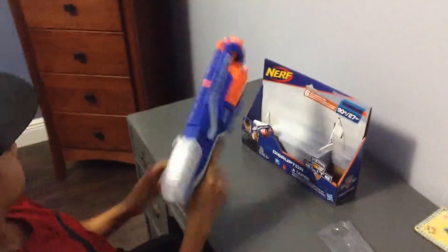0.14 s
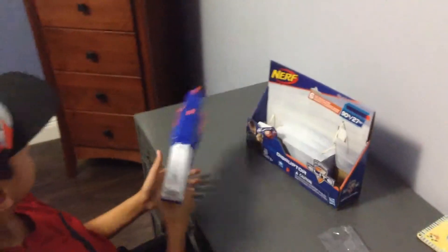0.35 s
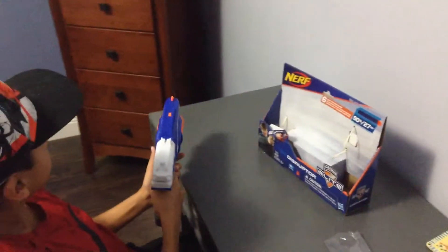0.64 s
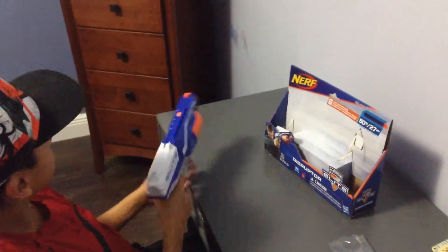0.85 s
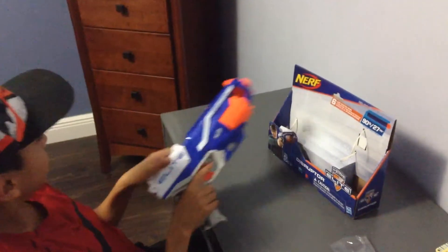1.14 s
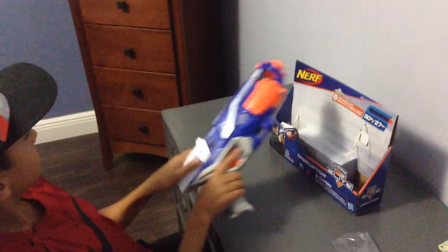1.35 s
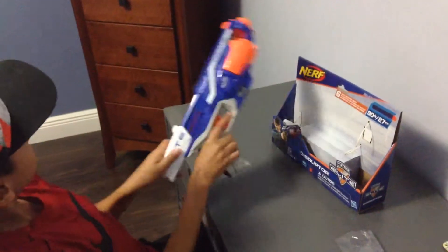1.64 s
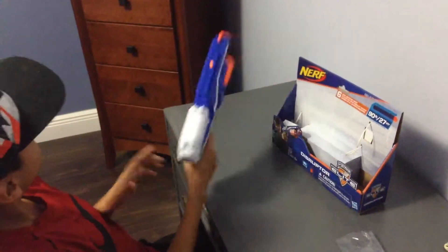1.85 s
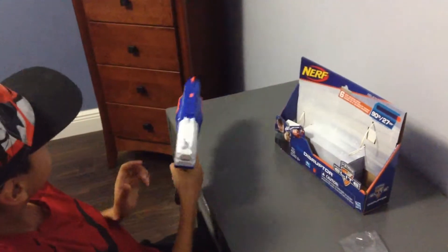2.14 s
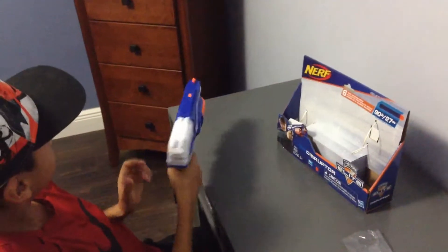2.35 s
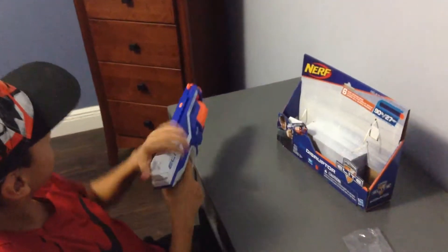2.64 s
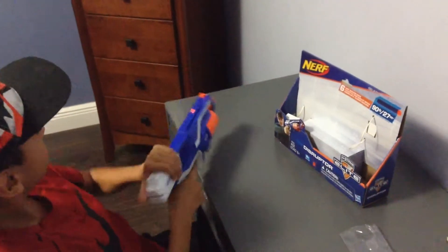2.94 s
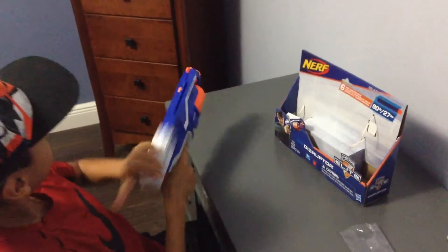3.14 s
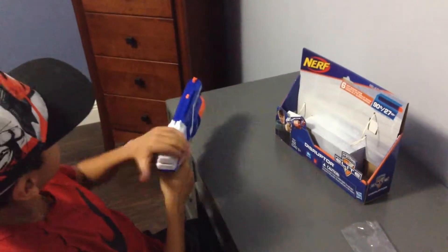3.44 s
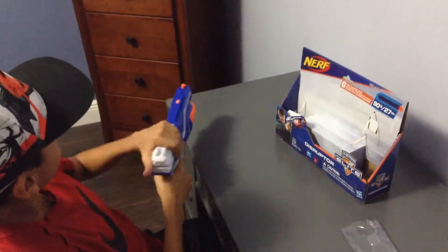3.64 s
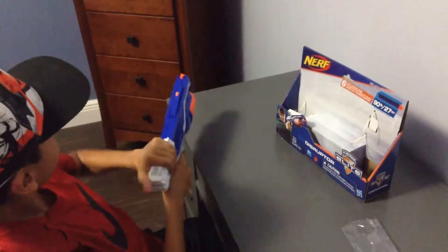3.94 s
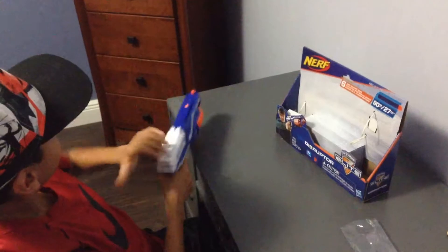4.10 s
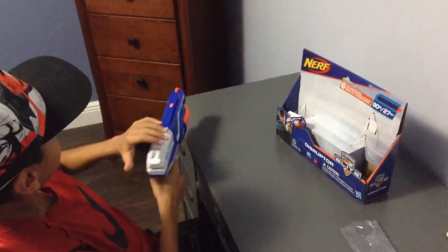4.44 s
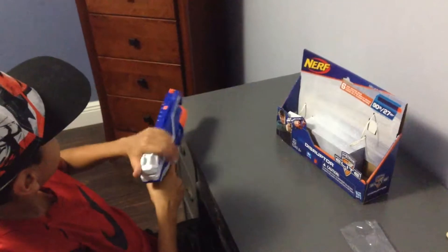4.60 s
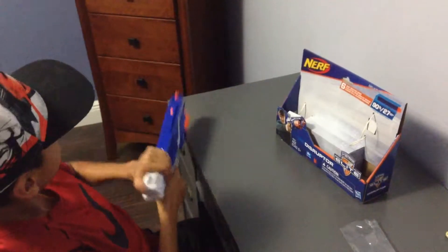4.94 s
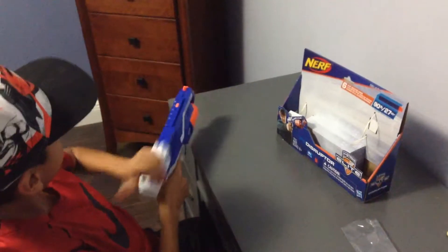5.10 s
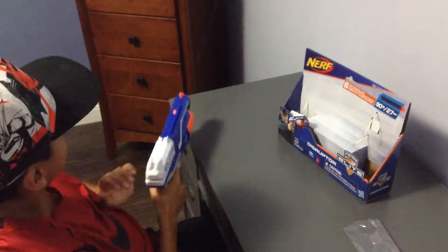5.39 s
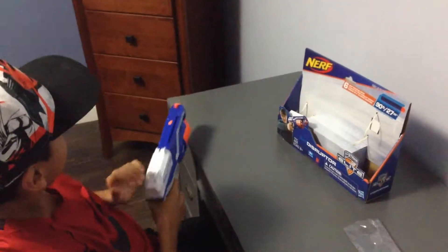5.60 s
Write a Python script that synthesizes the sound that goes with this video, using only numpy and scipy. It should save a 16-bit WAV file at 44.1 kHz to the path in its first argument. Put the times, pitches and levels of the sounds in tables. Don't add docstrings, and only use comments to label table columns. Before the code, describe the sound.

Loud plastic cocking slams, ratchety clicks and short scrapes alternate with popping dart shots and dull bounces, close up in a lightly echoing bedroom.

```python
import sys
import numpy as np
from scipy import signal
from scipy.fft import rfft, irfft
from scipy.io import wavfile
from scipy.ndimage import uniform_filter1d

SR = 44100
rng = np.random.default_rng(int(sys.argv[2]) if len(sys.argv) > 2 else 0)


def output_pcm(signal):
    pcm = np.clip(np.atleast_2d(signal).T, -1, 1) * 32767
    wavfile.write(sys.argv[1], SR, np.round(pcm).astype(np.int16))


def how_loud(loudness_db):
    steps = np.asarray(loudness_db, float) / 20
    return 10 ** steps


N = 254016

# (frequency [Hz], rms level [dB])
HUM = [(121, -72.5), (242, -59)]
# (frequency [Hz], density [dB per Hz])
AIR_SPECTRUM = [(24, -67), (40, -44), (158, -9), (241, -5.5), (387, -6), (522, 0), (1450, -12.5),
                (2060, -11), (2570, -18.5), (2770, -12.5), (4460, -18.5), (14400, -30.5), (15500, -31)]
# (frequency [Hz], time to fall 60 dB [s])
ROOM_T60 = [(130, 0.24), (330, 0.37), (870, 0.45), (2300, 0.43), (6000, 0.39), (14000, 0.27)]
# (delay [ms], level [dB])
WALLS = [(3.1, -9.5), (6.5, -15.5), (9, -15), (13, -16), (18, -27), (24, -17)]
# (frequency [Hz], width [Hz], gain [dB])
SHELL = [(500, 137, 2), (694, 104, 3), (1013, 53, 4), (1242, 54, 4.5), (2220, 88, 3), (4340, 420, 0.5),
         (6230, 340, 1), (9100, 1200, 1.5)]
# (frequency [Hz], density [dB per Hz])
RUB_SPECTRUM = [(120, -49), (200, -34), (258, -26), (376, -38), (512, 2), (963, 2), (1880, 1.5),
                (6770, -8.5), (15000, -19)]
# (start [s], end [s], start level [dB], end level [dB])
STROKES = [(0.0, 0.173, -35, -87), (1.07, 1.3, -53, -72), (1.33, 1.439, -62, -40.5),
           (1.447, 1.54, -50, -63.5), (1.682, 1.743, -36.5, -54), (1.75, 1.818, -61, -21.5),
           (2.457, 2.65, -47.5, -68), (2.783, 2.94, -34, -57.5), (3.079, 3.196, -41, -45),
           (3.718, 3.854, -37, -41.5), (3.983, 4.1, -44, -42), (4.6, 4.778, -72, -43.5),
           (4.781, 4.87, -40.5, -64), (5.053, 5.166, -54, -35.5)]

# (frequency [Hz], density [dB per Hz])
CLICK_SPECTRUM = [(120, -65), (200, -24.5), (413, -23.5), (627, -8), (809, -11), (1020, -7.5), (1550, -8),
                  (1730, -8.5), (3450, -10.5), (6760, -10.5), (15300, -19.5)]
SLAM_SPECTRUM = [(59, -51), (100, -55), (180, -25.5), (299, -6.5), (418, -5), (611, -6.5), (803, -11.5),
                 (1010, -6), (1480, -11.5), (2160, -9), (3030, -11), (9830, -9), (15300, -11)]
SHOT_SPECTRUM = [(59, -40), (100, -5), (227, -0.5), (377, -5.5), (574, -2), (723, -5), (856, -7.5),
                 (1420, -4), (3160, -9.5), (4420, -8.5), (7970, -12), (10000, -11.5), (15300, -16)]

# (time [s], blow [dB], ring [Hz], snap [dB])
CLICKS = [(0.081, -25.5, 2020, -19), (0.12, -19, 1400, -22.5), (1.1, -37, 950, -20),
          (1.318, -33.5, 2310, -19), (1.373, -31.5, 2050, -9), (1.427, -25.5, 670, -13),
          (2.509, -28, 1220, -13), (2.754, -30, 790, -14), (2.86, -20.5, 804, -11),
          (2.949, -6.5, 1020, -3.2), (3.08, -18.5, 1550, -2.5), (3.134, -28, 950, -8),
          (3.775, -21, 704, -12), (3.81, -11, 1140, -2), (3.846, -9.5, 960, -4), (3.989, -18.5, 1550, -5),
          (4.804, -21.5, 705, -7), (5.117, -25, 1160, -13)]
# (time [s], blow [dB], ring [Hz], snap [dB])
RATCHETS = [
    (0.134, -23, 1500, -2),
    (0.543, -35.5, 716, -14),
    (1.207, -29, 2600, -11),
    (1.541, -7.5, 1025, -2),
    (1.665, -16.5, 1840, -4),
    (2.773, -15.5, 2500, 8),
]
# (time [s], blow [dB], ring [Hz], snap [dB])
GRIPS = [
    (0.842, -30.5, 800, 1),
    (1.02, -44, 2930, -17),
    (1.466, -14, 2280, -10.5),
    (1.515, -16.5, 1460, -16),
    (3.72, -15.5, 1200, -4.5),
    (4.713, -21, 656, -9),
    (4.871, -9, 2060, -11),
    (5.05, -19, 1530, -13.5),
]
# (time [s], blow [dB], ring [Hz], chatter [ms])
CATCHES = [
    (1.544, -14.5, 4800, 6.5),
    (2.946, -6, 6100, 5),
    (3.853, -20, 4600, 4.5),
    (0.37, -38, 3000, 14),
]
# (time [s], blow [dB], ring [Hz], chatter [ms])
TOUCHES = [
    (1.758, -16, 1880, 3.1),
    (3.688, -31, 3050, 26),
    (.153, -18.5, 1600, 7.8),
    (1.779, -17, 1010, 9),
    (2.932, -18.5, 637, 9.9),
    (3.19, -30, 800, 5.4),
    (4.088, -19.5, 820, 3.9),
    (5.146, -22.5, 1180, 7.7),
]
# (time [s], blow [dB], ring [Hz], chatter [ms])
SLAMS = [
    (0.165, 4, 520, 7.9),
    (1.822, 5, 500, 3.32),
    (3.198, 8, 400, 8.26),
    (4.097, 8, 580, 4.74),
    (5.171, 8, 500, 5.9),
]
# (time [s], blow [dB], ring [Hz], snap [dB])
BUMPS = [
    (0.258, -9.5, 620, -11),
    (1.154, -13.5, 412, -29.5),
    (2.708, -29.5, 537, -47),
]
# (time [s], blow [dB], ring [Hz], snap [dB])
NUDGES = [
    (0.553, -35, 540, -27),
    (1.073, -24, 437, -28),
    (1.937, -13.5, 525, -20),
]
# (time [s], blow [dB], ring [Hz], chatter [ms])
BOUNCES = [
    (.73, -35, 300, 12),
    (2.38, -30, 298, 11),
    (3.55, -28.5, 300, 13.7),
    (4.392, -15.5, 610, 2.6),
    (4.403, -12.5, 1230, 7.2),
    (4.53, -24.5, 200, 16.3),
    (4.6, -36, 180, 20),
    (4.645, -39, 200, 10.5),
    (5.5, -28, 1298, 6.6),
]
# (time [s], blow [dB], ring [Hz], snap [dB])
DARTS = [
    (0.661, -20.5, 1300, -7),
    (2.288, -17.5, 650, -17),
    (3.459, -18.5, 2000, -12),
    (4.468, -24, 1230, 4),
    (5.455, -21, 1300, -14),
]
# (time [s], blow [dB], ring [Hz], chatter [ms])
SHOTS = [
    (0.604, -7, 654, 11.15),
    (2.238, -8.5, 716, 7.5),
    (3.405, -6, 684, 5.96),
    (4.338, -9, 555, 7.7),
    (5.381, -5.5, 1460, 9),
]
# (time [s], blow [dB], ring [Hz], chatter [ms])
WEAK_SHOTS = [
    (4.886, -18, 634, 7.25),
]
# (level beside the usual [dB], ring [Hz])
THUD_TONES = [
    (-.8, 400),
    (3, 600),
    (-.8, 230),
    (.8, 300),
    (1.5, 750),
    (-1.5, 300),
]


def evened(x):
    return x / np.sqrt(np.mean(x ** 2) + 1e-20)


def read(points, hz):
    f, value = np.transpose(points)
    return np.interp(np.log(hz + 1), np.log(f + 1), value)


def band(x, hz, kind, order=2):
    return signal.sosfilt(signal.butter(order, hz, kind, fs=SR, output="sos"), x)


def coloured(points):
    hz = np.fft.rfftfreq(N, 1 / SR)
    return evened(irfft(rfft(rng.standard_normal(N)) * how_loud(read(points, hz)), N))


def causal(db):
    both_sides = np.concatenate([db, db[-2:0:-1]])
    log_gain = np.log(how_loud(np.maximum(both_sides, -100)))
    h = np.fft.ifft(np.exp(log_gain - 1j * signal.hilbert(log_gain).imag)).real
    return h / np.linalg.norm(h)


def resonance_db(hz, modes):
    return sum(db / (1 + (2 * (hz - f) / width) ** 2) for f, width, db in modes)


def wavering(hz):
    return evened(band(rng.standard_normal(N), hz, "low"))


def background():
    t = np.arange(N) / SR
    waver = 1 + 0.54 * wavering(9.6)
    hum = sum(np.sqrt(2) * how_loud(db) * np.sin(2 * np.pi * hz * t) for hz, db in HUM)
    air = how_loud(-53) * coloured(AIR_SPECTRUM) * how_loud(0.27 * wavering(5.1))
    return air + waver * hum


def room(direct, spread, tail_db):
    out = direct.copy()
    for ms, db in WALLS:
        lag = round(ms * SR / 1000)
        out[lag:] += how_loud(db) * direct[:-lag] * rng.choice([-1, 1])
    turn = np.floor(np.arange(N) / SR * 9) % 4
    for k in range(4):
        hz, t, z = signal.stft(rng.standard_normal(SR), SR, nperseg=256)
        decay = how_loud(-60 * t / read(ROOM_T60, hz)[:, None])
        tail = signal.istft(z * decay, SR, nperseg=256)[1]
        tail *= np.minimum(np.arange(len(tail)) / SR / 0.0047, 1)
        fed = spread * uniform_filter1d(1. * (turn == k), 400)
        out += how_loud(tail_db) * signal.fftconvolve(fed, tail / np.linalg.norm(tail))[:N]
    return out


def scrape():
    t, level = np.arange(N) / SR, np.zeros(N)
    for start, end, start_db, end_db in STROKES:
        level += how_loud(np.interp(t, [start, end], [start_db, end_db], -120, -120))
    slips = how_loud(2.4 * wavering(40))
    grain_size = how_loud(0.75 * np.minimum(rng.exponential(1, N), 5))
    grit = grain_size * (rng.random(N) < 2500 / SR)
    rub = coloured(RUB_SPECTRUM) * (.5 + evened(uniform_filter1d(grit, 30)))
    body = causal(resonance_db(np.fft.rfftfreq(2048, 1 / SR), SHELL))
    heard = evened(slips * signal.oaconvolve(rub, body)[:N])
    return how_loud(1.5) * uniform_filter1d(level, 300) * heard


def same_snap(table, ring_db, snap_db):
    return [(s, db, ring_db, snap_db, hz, ms) for s, db, hz, ms in table]


def same_chatter(table, ring_db, ms):
    return [(s, db, ring_db, snap_db, hz, ms) for s, db, hz, snap_db in table]


def knocks(table, colour, level_db, usual_snap_db, taps_per_ms, rise, ring_q, lumps_db, wet_db, rattle):
    out, t, hz = np.zeros((2, N + 4096)), np.arange(2048) / SR, np.fft.rfftfreq(2048, 1 / SR)
    for s, blow_db, ring_db, snap_db, ring_hz, ms in table:
        chance, size, sign = rng.random((2048, 3)).T
        u = t / (max(ms, 1) / 1000)
        struck = chance < taps_per_ms * 1000 / SR
        taps = struck * (sign - .5) * how_loud(3.6 * size) + 0.11 * (size - .5)
        loose = rattle * (size > .7) * np.exp(-t / 0.016)
        taps *= np.minimum(u / rise, 1) ** 2 * (np.exp(-1.5 * u ** 2) + loose)
        snap = (snap_db - usual_snap_db) / (1 + (4000 / (hz + 1)) ** 3)
        panels = [(f, f / 5.3, lumps_db * (2 * k - 1)) for f, k in zip(300 * 45 ** chance[:14], sign)]
        plain_db = read(colour, hz) + snap + resonance_db(hz, SHELL + panels)
        ring = resonance_db(hz, [(ring_hz, ring_hz / ring_q, min(ring_db, 17))])
        gain = how_loud(level_db + blow_db)
        at = round(s * SR)
        late = round((s + rise * ms / 2000) * SR)
        body = gain * causal(plain_db + ring)
        out[0, at:at + 4095] += signal.fftconvolve(taps / np.linalg.norm(taps), body)
        out[1, late:late + 2048] += gain * how_loud(wet_db) * causal(plain_db + 0.84 * ring)
    return out[:, :N]


def latches():
    rows = same_chatter(CLICKS, ring_db=14.5, ms=3.6) + same_chatter(RATCHETS, ring_db=13, ms=9.8)
    rows += same_chatter(GRIPS, ring_db=-3.0, ms=5.5)
    rows += same_snap(CATCHES, ring_db=5, snap_db=10.0) + same_snap(TOUCHES, ring_db=15.5, snap_db=-14.0)
    return knocks(rows, CLICK_SPECTRUM, level_db=16, usual_snap_db=-8.5, taps_per_ms=5.0, rise=0.19,
                  ring_q=3.5, lumps_db=6.0, wet_db=-1.5, rattle=0.35)


def floor_bounces():
    rows = same_snap(BOUNCES, ring_db=14.5, snap_db=-13)
    return knocks(rows, SHOT_SPECTRUM, level_db=16, usual_snap_db=-10, taps_per_ms=1.6, rise=1.0,
                  ring_q=0.44, lumps_db=5, wet_db=5.0, rattle=0.15)


def wall_booms():
    table = [(s + .00301, db - 4.5, 330, 6.25) for s, db, *_ in DARTS]
    rows = same_snap(table, ring_db=10.5, snap_db=-25)
    return knocks(rows, SHOT_SPECTRUM, level_db=24.5, usual_snap_db=4, taps_per_ms=1.8, rise=0.412,
                  ring_q=1.3, lumps_db=8, wet_db=-6.5, rattle=0.092)


def slide_slams():
    rows = same_snap(SLAMS, ring_db=2.5, snap_db=-13.5)
    rows += same_chatter(BUMPS, ring_db=15.0, ms=4.5) + same_chatter(NUDGES, ring_db=3, ms=6)
    return knocks(rows, SLAM_SPECTRUM, level_db=11.5, usual_snap_db=-4.0, taps_per_ms=5.4, rise=0.6,
                  ring_q=1.4, lumps_db=6.5, wet_db=-2.5, rattle=0.36)


def slide_cracks():
    table = [(s + .0035, db - 1, 520, 1.33) for s, db, *_ in SLAMS]
    rows = same_snap(table, ring_db=8, snap_db=-4.5)
    return knocks(rows, SLAM_SPECTRUM, level_db=8.5, usual_snap_db=-3.0, taps_per_ms=2.6, rise=0.3,
                  ring_q=3.0, lumps_db=7.5, wet_db=-12.5, rattle=0.041)


def plunger_thuds():
    releases = sorted(SHOTS + WEAK_SHOTS)
    table = [(s + .0085, db + 0.5 + more_db, hz, 5.5)
             for (s, db, *_), (more_db, hz) in zip(releases, THUD_TONES)]
    rows = same_snap(table, ring_db=7, snap_db=-12)
    return knocks(rows, SHOT_SPECTRUM, level_db=22, usual_snap_db=-1, taps_per_ms=1.5, rise=0.362,
                  ring_q=1.5, lumps_db=8.5, wet_db=-8, rattle=0.17)


def shots():
    rows = same_snap(SHOTS, ring_db=1.5, snap_db=2.0) + same_snap(WEAK_SHOTS, ring_db=9, snap_db=3.0)
    rows += same_chatter(DARTS, ring_db=1, ms=7.6)
    return knocks(rows, SHOT_SPECTRUM, level_db=27.5, usual_snap_db=-1.0, taps_per_ms=9.0, rise=0.97,
                  ring_q=2.6, lumps_db=4.5, wet_db=0.5, rattle=0.16)


def scene():
    rubbing = scrape() * how_loud(np.array([[0], [-3]]))
    blows = latches() + slide_slams() + slide_cracks()
    firing = shots() + plunger_thuds() + wall_booms() + floor_bounces()
    direct, spread = rubbing + blows + firing
    return (room(direct, spread, tail_db=2) + background())[None]


def top_cut(x):
    return signal.sosfilt(signal.butter(12, 16390, fs=SR, output="sos"), x)


def record(dry):
    x = band(dry[0], 143.6, "high", order=6)
    x += how_loud(-96) * evened(band(rng.standard_normal(N), (40, 110), "band"))
    power_db = 10 * np.log10(signal.lfilter([.004], [1, -.996], x ** 2) + 1e-12)
    fall = np.arange(N) * 227.0 / SR
    held_db = np.maximum.accumulate(power_db + fall) - fall
    over_db = np.maximum(held_db + 13.5, 0)
    x = 0.94 * np.tanh(0.94 * x / how_loud(0.53 * over_db))
    edge = signal.firwin2(1023, [0, 15200, 15450, 16300, 16450, SR / 2], [1, 1, .03, .03, 0, 0],
                          fs=SR, window=("kaiser", 9))
    return top_cut(signal.oaconvolve(x, edge, "same")[None])


dry = scene()
out = record(dry)
output_pcm(out)
```